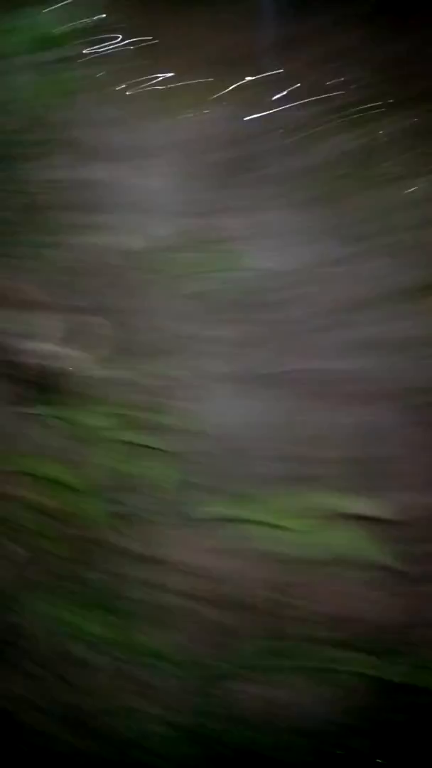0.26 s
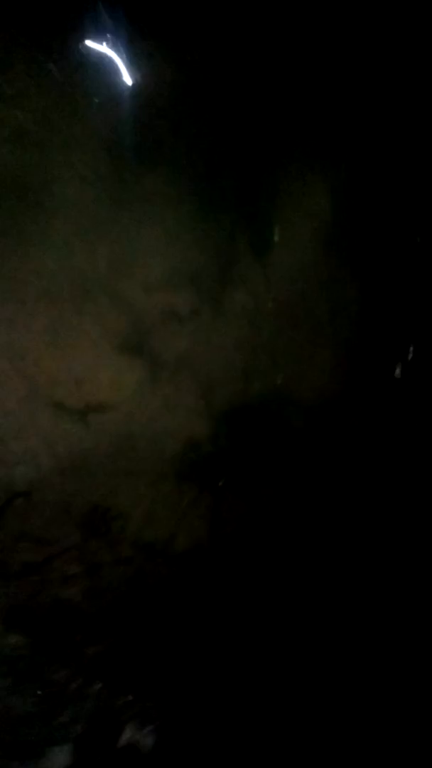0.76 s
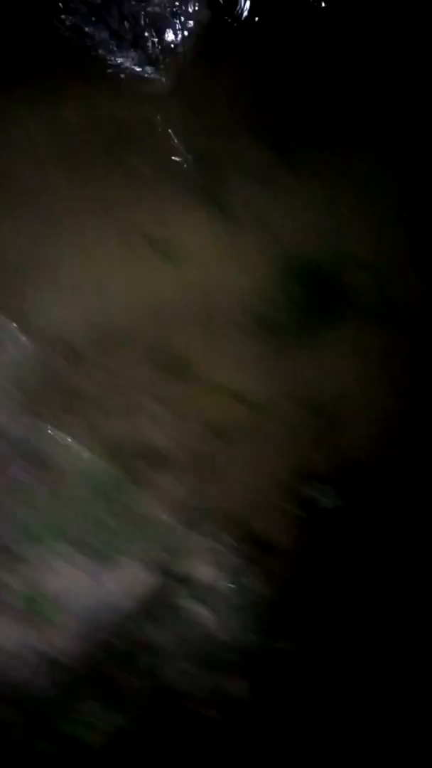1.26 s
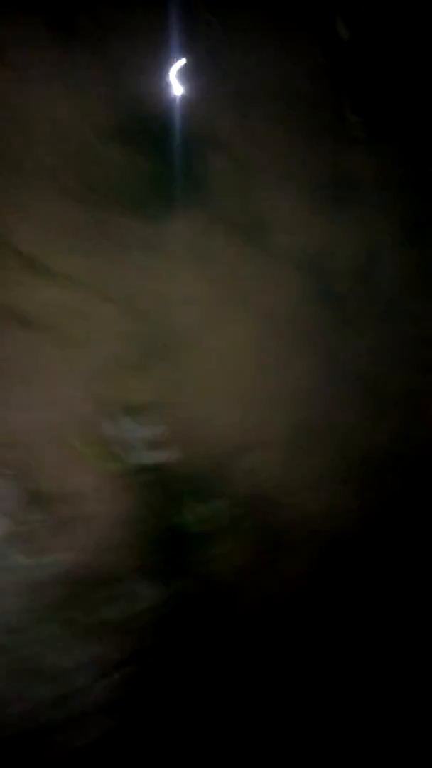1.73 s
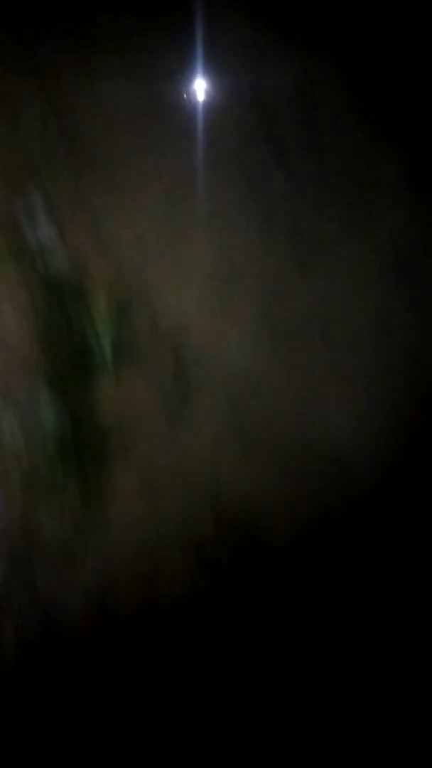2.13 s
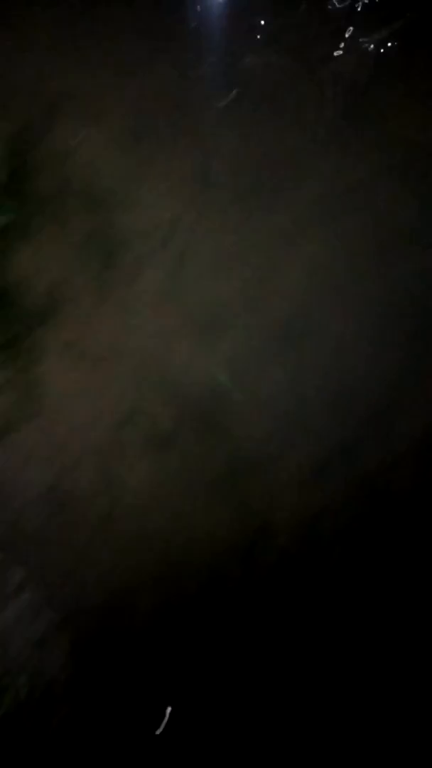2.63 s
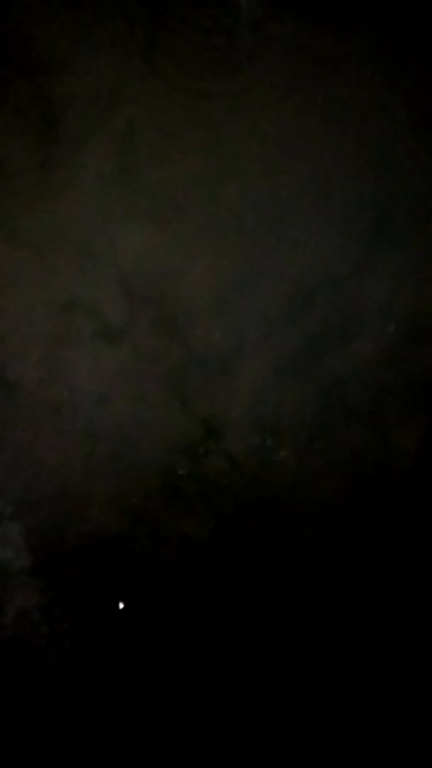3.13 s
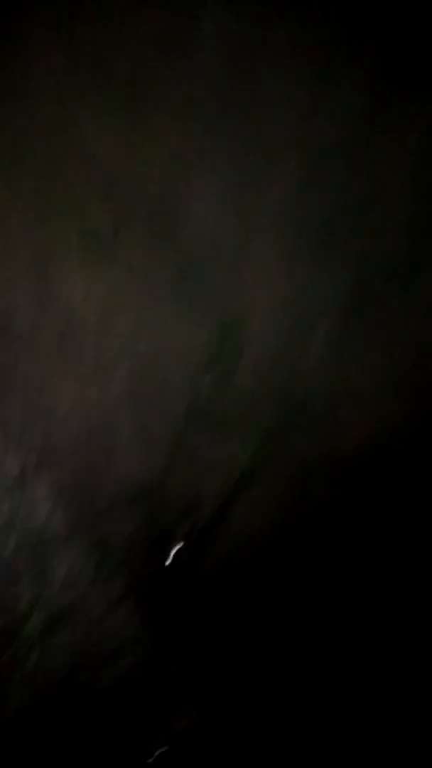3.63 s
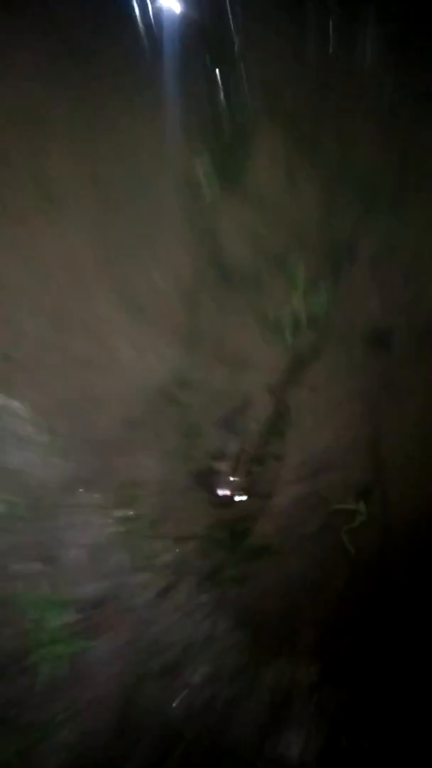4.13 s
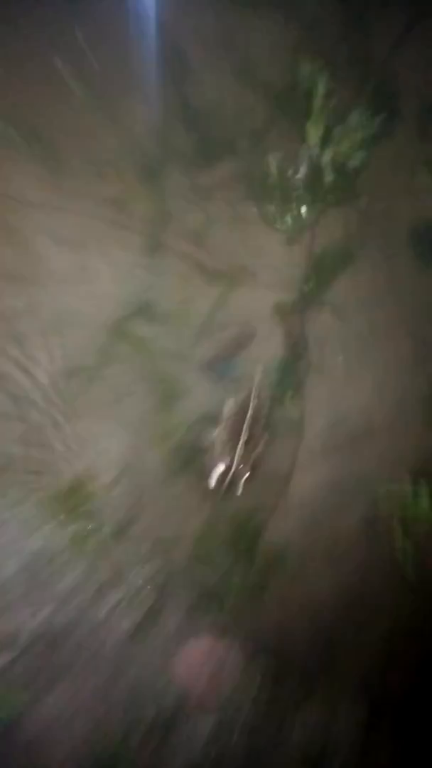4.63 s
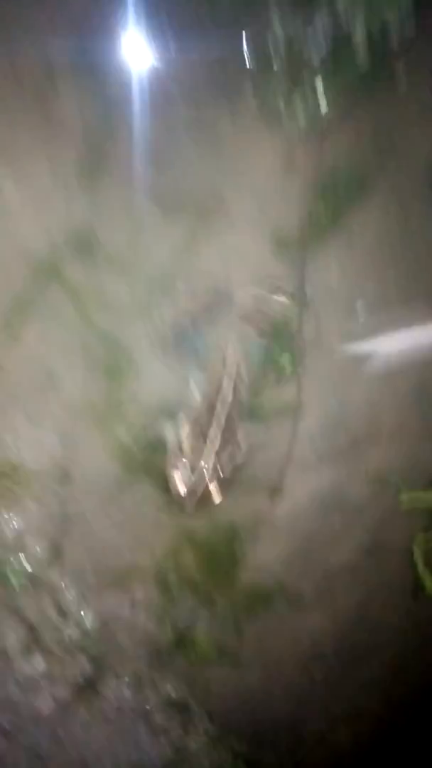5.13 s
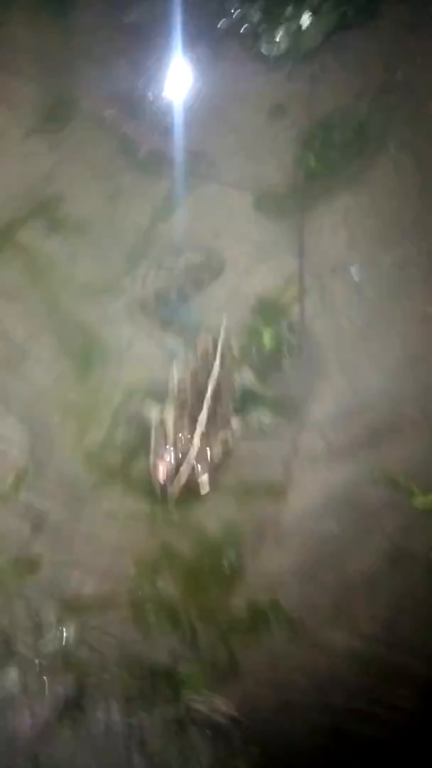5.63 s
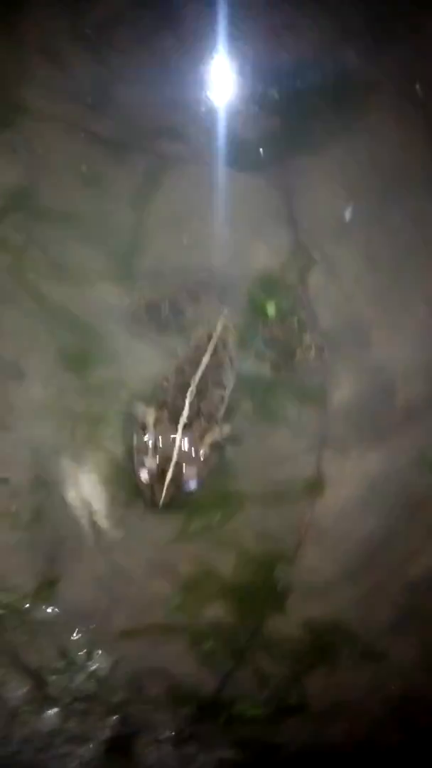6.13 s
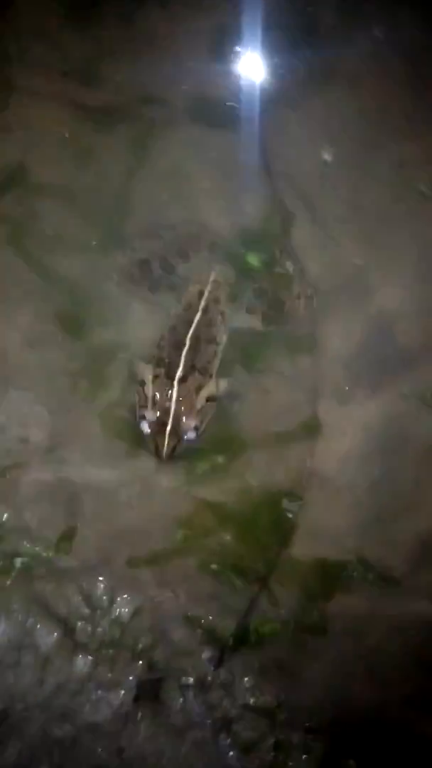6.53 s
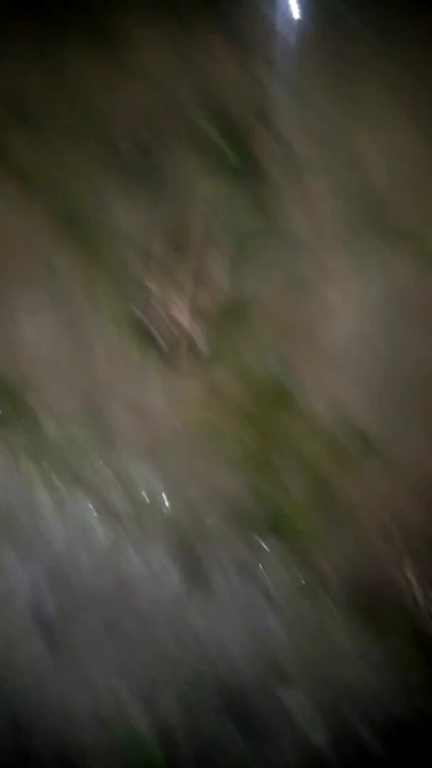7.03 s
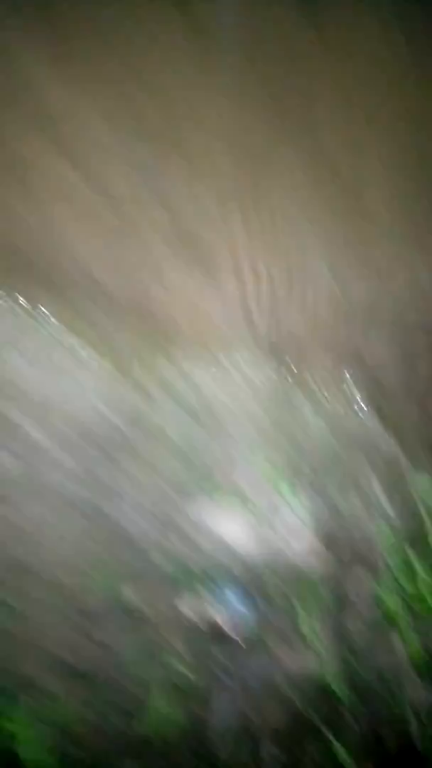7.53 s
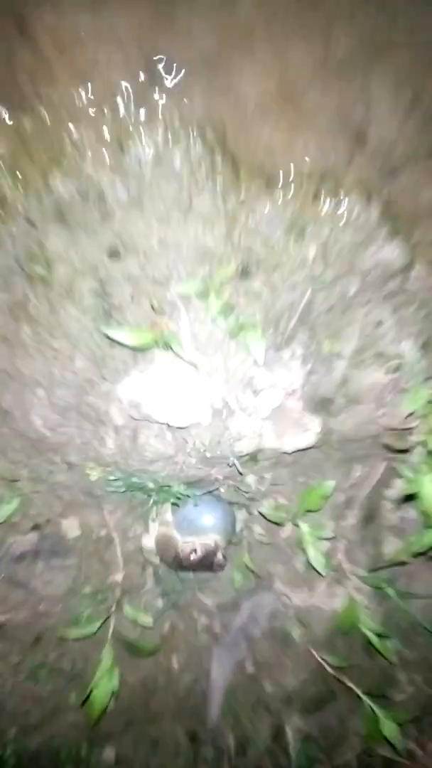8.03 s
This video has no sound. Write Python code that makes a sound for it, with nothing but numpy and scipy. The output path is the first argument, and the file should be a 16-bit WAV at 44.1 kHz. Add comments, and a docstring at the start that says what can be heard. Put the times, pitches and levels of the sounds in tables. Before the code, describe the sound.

Close, unbroken toad trilling, about seven notes a second, muffled then suddenly bright near the end, with far toads and light handling noise.

```python
"""A pond edge at night. From the start a toad trills close by: each note is a run of pulses and a held tone that sags.
Over soft night hiss, far toads call alike; steps rustle, click and thump, and low air noise swells as the camera swings.
The hand-held camera turns away in the first second. After 1 s, lead-in pulses come before each note.
Soft hoots sound from 2.5 s, a neighbour toad joins at 3 s, and false starts slip in from 5.4 s.
The camera faces the toad again at 7.5 s. Toads are sine pulses that strike resonances; the rest is mostly shaped noise."""
import sys
import numpy as np
from scipy import signal
from scipy.io import wavfile
from scipy.ndimage import uniform_filter1d

SR = 44100
rng = np.random.default_rng(int(sys.argv[2]) if len(sys.argv) > 2 else 0)


def store_wav(level_fs):
    """Save 16-bit WAV to argv[1]."""
    pcm = np.round(np.clip(np.atleast_2d(level_fs), -1, 1) * 32767)
    wavfile.write(sys.argv[1], SR, pcm.T.astype(np.int16))


N = 365148  # length in samples

# short pulses in a run: valid until t/s, number of pulses
PULSES_PER_RUN = [(.1, 5), (.25, 4), (.5, 3), (1, 4), (2.45, 3), (9, 4)]
# how the near toad is heard: t/s, pulse level/dB, microphone facing the toad (acts on the rings)/dB, overtones/dB
TOAD = [(0, -25.5, -2, 0.5), (.55, -20.5, -8, -6.5), (.85, -20, -8, -17), (1.15, -16, -14.5, -11.5),
        (1.9, -16, -10, -18), (2.3, -15.5, -10.5, -7.5), (2.6, -13, -16, -14.5), (3.6, -14.5, -8.5, -12.5),
        (4.15, -15.5, -1, -3), (4.4, -13.5, -4.5, -2), (5, -9.5, -11.5, -15), (5.8, -9.5, -11, -7),
        (7.2, -9.5, -8.5, -2), (7.5, -11.5, 7, 11), (7.8, -10.5, 9.5, 7.5), (8.28, -10, 8.5, 6)]
# overtones of the sac: multiple of the pitch, relative level in pulses/dB, in the held tone/dB
OVERTONES = [(2, -17.5, -14.5), (3, -49.5, -37.5)]
# resonances that stay put and that each pulse strikes: f/Hz, width/Hz, relative level/dB, share of the facing
RINGS = [(640, 300, -17, .1), (925, 150, -13, .1), (2250, 400, -28, .6), (2850, 350, -21, .5),
         (3800, 550, -30, .9), (5620, 70, -31, -.2), (6250, 60, -30, .8), (7780, 70, -56, .2),
         (9200, 90, -58, .1), (10050, 170, -43, .25), (10900, 120, -46, .7), (11350, 220, -42, .8)]
# far toads: pitch f/Hz before glides, notes a second, relative level/dB
FAR = [(1702, 6.3, 1.5), (1567, 7.2, 0.5), (1496, 7.7, -6), (1395.5, 6.4, 5)]
# far toads together: t/s, level/dB
CHORUS = [(0, -38.5), (1.6, -39.5), (5.7, -40.5), (8.28, -38.5)]
# spectrum of leaves and cloth: f/Hz, relative level/dB
RUSTLE_COLOUR = [(200, -21.5), (800, 11.5), (3000, -3.5), (7000, -11), (8600, -13.5), (10500, -14),
                 (12800, -25), (15000, -9)]
# spectrum of the night hiss: f/Hz, relative level/dB
NIGHT_COLOUR = [(300, -1), (900, 8), (3000, 2.5), (3800, -17), (5500, -24), (8700, -33), (10300, -30.5),
                (12500, -35.5), (14900, -22.5)]
NIGHT_DB = -54
# snaps of twigs and grip: t/s, peak level/dB, f/Hz
CLICKS = [(0.149, -37, 15300), (0.604, -38.5, 14800), (0.837, -29, 4000), (1.095, -33, 5010),
          (1.104, -27.5, 15500), (1.2065, -31, 5360), (1.308, -37, 4310), (1.331, -30.5, 4300),
          (1.3579, -34, 10630), (1.4299, -42, 8700), (1.479, -35.5, 6300), (2.813, -34.5, 6860),
          (3.497, -32.5, 6960), (3.5347, -39.5, 8050), (3.7714, -39.5, 7200), (6.9267, -45, 8000),
          (7.0554, -46, 14500), (7.0853, -40, 8700), (7.1786, -38, 14500), (7.2031, -36, 8700),
          (7.2285, -39, 9000), (7.2923, -36, 8700)]
# thumps on the body of the camera: t/s, relative level/dB, starting f/Hz, pitch change in 40 ms (share)
THUMPS = [(.454, -37, 110, 0.3), (1.366, -40.5, 108, 0.07), (1.953, -36, 560, -.1), (2.166, -35, 570, -.6),
          (2.186, -30, 275, -1.2), (2.277, -26.5, 310, 4), (7.385, -32.5, 155.2, 0.2),
          (7.561, -38, 140, -0.43), (7.637, -38.5, 125, 0.45), (8.04, -35, 154, -.2)]
# spectrum of air on the microphone port: f/Hz, relative level/dB
RUMBLE_COLOUR = [(40, -23), (65, 0), (140, 1.5), (300, -11.5), (600, -38.5), (15000, -84.5)]
# the rumble, up when the camera swings: t/s, level/dB
RUMBLE_DB = [(0, -69), (.45, -49), (.9, -68), (1.4, -50), (1.8, -61.5), (2.2, -57.5), (2.7, -65.5),
             (4.2, -66), (4.6, -50), (5, -64), (6.7, -58.5), (7.3, -53), (8.28, -52)]
# notes of the near toad: run starts at t/s, held tone against the pulses/dB
NOTES = [(0.048, -1.5), (0.183, -3.5), (0.308, -2.5), (0.426, -2), (0.545, -4.5), (0.669, -6),
         (0.795, -5.5), (0.9144, -1.5), (1.0584, -2.5), (1.204, -4), (1.3481, -5.5), (1.4938, -4.5),
         (1.6355, -2), (1.79, -4), (1.9318, -3.5), (2.0742, -4), (2.2203, -3.5), (2.3617, -2.5),
         (2.5087, -6), (2.6519, -6.5), (2.797, -4.5), (2.9427, -6), (3.0899, -4), (3.2355, -5.5),
         (3.381, -7), (3.527, -7), (3.677, -6.5), (3.822, -1.5), (3.9676, -2), (4.1109, -5), (4.2545, -2),
         (4.4018, -4), (4.5501, -5.5), (4.6962, -7.5), (4.835, -4.5), (4.9794, -5.5), (5.1231, -5),
         (5.267, -6), (5.425, -6), (5.575, -4.5), (5.724, -6.5), (5.871, -5), (6.012, -4), (6.1785, -4),
         (6.3234, -5), (6.47, -5.5), (6.6136, -5.5), (6.7556, -6.5), (6.9037, -8), (7.0443, -7),
         (7.1902, -3.5), (7.3492, -4.5), (7.498, -8.5), (7.6463, -5), (7.7878, -7), (7.9348, -7),
         (8.0761, -6), (8.224, -5.5)]
# lead-ins that the run does not follow at once: t/s, number of pulses
FALSE_STARTS = [(5.3811, 2), (6.1292, 3), (7.3055, 2)]
# notes near these times have three lead-in pulses, the others two: t/s
LONG_LEADS = [1.79, 1.93, 4.55, 4.7, 5.27, 5.72, 7.19, 7.5, 7.65, 8.22]
# steps and grips in leaves and cloth: t/s, hold/s, relative level/dB
STEPS = [(0.125, 0.023, -67), (0.592, 0.022, -67.5), (0.816, 0.16, -64.5), (1.083, 0.099, -66.5),
         (1.304, 0.016, -62), (1.87, 0.49, -60.5), (2.26, 0.13, -53.5), (2.475, 0.46, -71),
         (3.386, 0.24, -69), (3.771, 0.073, -66), (6.693, 0.16, -67), (7.07, 0.22, -64.5)]
# a neighbour a few metres off, turned towards the microphone: runs start at t/s
NEIGHBOUR = [2.99, 3.137, 3.259, 3.539, 3.678, 3.997, 4.159, 4.297, 4.437, 4.606, 4.744, 4.871, 5, 5.139,
             5.281, 5.423, 6.079, 6.225, 6.361, 6.489, 7.4, 7.549]
# brief soft low tones, far off: t/s, f/Hz, peak level/dB
HOOTS = [(2.538, 226, -49), (3.54, 413, -50), (7.952, 351, -49)]

PITCH_HZ, COLD_HZ, WARM_S, CLIMB_HZ_PER_S = 1457.3, 96.4, 0.64, 4.5  # the sac starts low and warms up
GAP_CYCLES, HELD_MS = 11.8, 12.75  # pulses lie so many cycles of the sac apart; the held tone then fades
LEADS_FROM_S = 1  # no lead-ins before this
LEAD_MS, LONG_LEAD_MS, QUICK_LEAD_MS = 27, 29.8, 17.5  # ahead of the run: two pulses, three, after a false start
THROAT_HZ, THROAT_WIDTH_HZ, THROAT_DB = 2770, 440, -21.5  # lifts the second overtone
VOICE_LOW_HZ, VOICE_TOP_HZ = 530, 11700
BOUNCE_MS, BOUNCE_DB = 3.2, -9  # average delay of the echo off the water
BOUNCE_SWAY_MS, BOUNCE_SWAY_HZ = 0.788, .35  # its typical shift and slowest rate as the hand sways
STEP_ATTACK_S, STEP_FADE_DB_PER_S, STILL_DB = 0.013, 178.5, -75  # the last is relative, like the step levels
NEIGHBOUR_HZ, NEIGHBOUR_DB, NEIGHBOUR_BRIGHT_DB = 1412, -38, 11  # pitch before glides; pulse level; overtones
LOW_CUT_HZ, EDGE_HZ = 71, 15600  # bass cut of the microphone; upper limit of the whole sound


def amp(db):
    """Turn decibels into a plain multiplier."""
    return 10 ** (np.asarray(db) / 20)


def evened(x):
    """Scale a sound to an average (RMS) strength of 1."""
    return x / np.sqrt(np.mean(x ** 2) + 1e-20)


def add(mix, s, sound):
    """Lay a sound into the mix at s seconds, cut off at the end."""
    part = mix[..., max(round(s * SR), 0):][..., :sound.shape[-1]]
    part += sound[..., :part.shape[-1]]


def curve(rows, column=1):
    """Draw straight lines between the table's points, one value a sample."""
    rows = np.array(rows)
    return np.interp(np.arange(N) / SR, rows[:, 0], rows[:, column])


def ring(x, hz, width):
    """A resonance: each click starts a sine of its own height that dies away, faster if the width is larger."""
    decay, step = np.exp(-np.pi * width / SR), 2 * np.pi * hz / SR
    return signal.lfilter([0, np.sin(step)], [1, -2 * decay * np.cos(step), decay * decay], x)


def noise(colour, patchy_db, flicker_db, size=16):
    """Random short-time spectra with patches (size frames long) and flicker across all pitches at once."""
    frames, hz = N // 128 + 5, np.fft.rfftfreq(512, 1 / SR)
    real, imaginary, patches = rng.standard_normal((frames, 257, 3)).T
    patches = uniform_filter1d(patches, size=8, axis=0)  # smooth over pitch
    patches = evened(uniform_filter1d(patches, size=size, axis=1))  # smooth over time
    f, db = np.transpose(colour)
    level_db = np.interp(np.log(hz + 1), np.log(f), db)[:, None] + patchy_db * patches
    level_db = level_db + flicker_db * rng.standard_normal(frames)
    spectra = (real + 1j * imaginary) * amp(level_db)
    return evened(signal.istft(spectra, nperseg=512, noverlap=384)[1][:N])


def tail(x, t60):
    """Diffuse echoes from bank and bushes: scattered random taps, energy 1, that fall 60 dB in t60 seconds."""
    t = np.arange(SR // 2) / SR
    scattered = rng.standard_normal(len(t)) * (rng.random(len(t)) < .05)
    taps = scattered * amp(-60 * t / t60) * (t > .004)
    return signal.oaconvolve(x, taps / np.linalg.norm(taps))[:N]


def night_hiss():
    """Soft, patchy, flickering background noise."""
    return amp(NIGHT_DB) * noise(NIGHT_COLOUR, 2.5, 2.5, size=30)


def rumble():
    """Air on the microphone port: low noise that swells when the camera swings."""
    return amp(curve(RUMBLE_DB)) * noise(RUMBLE_COLOUR, 5.5, 1.6, size=40)


def pulse(voice, s, db, hz, direct, held_ms=0):
    """The folds snap open and the sac rings; a held tone lasts and sags. Rows: tone, overtones, drive of the rings."""
    t = np.arange(round((held_ms + 16) * SR / 1000)) * 1000 / SR  # in ms
    rise = 2.6 - 1.3 * direct  # in ms; heard from the front (direct = 1), a pulse starts sharper
    if held_ms:
        swell = np.sin(np.pi / 2 * np.clip(t / rise, 0, 1))
        shape = swell * amp(-.3 * t) / (1 + np.exp((t - held_ms - 3.8) / 1.7))
        glide = .985 - 0.06 * np.clip(t / (held_ms + 4), 0, 1.2)
        fold_multiples = (4, 8)
    else:
        hump = (t / rise * np.exp(1 - t / rise)) ** (2.4 - 1.6 * direct)
        shape = hump * np.sin(np.pi / 2 * np.minimum(t / 0.33, 1)) ** 2
        glide = 1.015 - .004 * t
        fold_multiples = (4, 5)
    turn = 2 * np.pi * np.cumsum(hz * glide) / SR
    wobble = .014 * np.cumsum(rng.standard_normal(len(t)))
    sound = np.zeros((3, len(t)))
    # from the front the overtones outlast the held tone
    sound[0] = shape * np.sin(turn) * amp(-.35 * direct * t * (held_ms > 0))
    overtones = sum(amp(held if held_ms else short) * np.sin(k * turn) for k, short, held in OVERTONES)
    sound[1] = shape ** 1.41 * overtones
    # high multiples of the folds, unsteady
    sound[2] = amp(-39.0) * shape * sum(np.sin(k * (turn + wobble)) for k in fold_multiples)
    # air hissing past them
    hiss = np.diff(rng.standard_normal(len(t) + 2), 2)
    sound[2] += amp(-33 if held_ms else -24) * shape ** 2 * hiss
    snap = np.hanning(15) / 7
    sound[2, 20:35] += snap * (.6 if held_ms else 1.1) * amp(2.4 * rng.standard_normal())
    sound[2] *= amp(0.5 * (db - 4.0))  # harder pulses ring more
    add(voice, s - rise / 1000, amp(db) * sound)


def run_of_pulses(voice, hz, direct, spacing_ms, held_ms, count, s, db, held_db):
    """The first gap is shorter and the first pulse weaker and higher; the held tone takes the last place."""
    luck = rng.standard_normal((6, 3))  # small differences in level, pitch and timing
    for k in range(count):
        first = k == 0
        at = s + (max(k - .13, 0) * spacing_ms + .25 * luck[k, 2]) / 1000
        level_db = db - 1.9 * first - 0.56 * max(k - 1, 0) + 0.58 * luck[k, 0]
        pulse(voice, at, level_db, hz * (1 + 0.028 * first + 0.013 * luck[k, 1]), direct)
    held_at = s + (count - .25) * spacing_ms / 1000
    pulse(voice, held_at, held_db + 2.0, hz, direct, held_ms)


def lead_in(voice, hz, direct, s, count, db):
    """Two or three pulses ahead of a run; the second is set strongest."""
    luck = rng.standard_normal((3, 2))
    for k in range(count):
        level_db = db - (3.3, 1.3, 3.6)[k] + 0.38 * luck[k, 0]
        pulse(voice, s - .0006 + k * .0079, level_db, hz * (0.989 + 0.0027 * luck[k, 1]), direct)


def voiced(voice, facing_db, overtone_db):
    """Tone, overtones and rings, brighter when the microphone faces the animal; so small a body sends out no bass."""
    tone, overtones, drive = voice
    rings = 0
    for hz, width, db, share in RINGS:
        soft = 150 + 3 * width  # two wider resonances round the start of each ring
        rounded = ring(ring(drive, hz, soft), hz, 2 * soft)
        struck = ring(rounded, hz, width) * soft ** 2 / 12340000.0
        rings = rings + amp(db + share * facing_db) * struck
    throat = amp(THROAT_DB) * ring(overtones, THROAT_HZ, THROAT_WIDTH_HZ)
    sound = tone + amp(overtone_db) * (0.49 * overtones + throat) + rings
    sound = signal.sosfilt(signal.butter(8, VOICE_TOP_HZ, fs=SR, output="sos"), sound)
    return signal.sosfilt(signal.butter(6, VOICE_LOW_HZ, "high", fs=SR, output="sos"), sound)


def chorus():
    """Each far toad keeps its own slightly uneven beat; distance adds echoes."""
    voice = np.zeros((3, N))
    for hz, rate, db in FAR:
        beats = np.arange(70) + rng.random() + .08 * rng.standard_normal(70)
        for s in beats / rate:
            lead_in(voice, hz, 0.3088, s, 2, db)
            run_of_pulses(voice, hz * .99, .3, 7.9, 14, 4, s + .027, db, db - 3)
    voice[2] *= .3
    dry = voiced(voice, 0.42, -0.52)
    return amp(curve(CHORUS)) * evened(dry + amp(-2.5) * tail(dry, 0.24))


def bounce(x):
    """One reflection off the water, whose path length wanders as the hand sways."""
    t = np.arange(N) / SR
    waves = (np.sin(2 * np.pi * (BOUNCE_SWAY_HZ * k * t + rng.random())) / k for k in (1, 1.7, 3.1))
    sway = evened(sum(waves))
    return amp(BOUNCE_DB) * np.interp(t - (BOUNCE_MS + BOUNCE_SWAY_MS * sway) / 1000, t, x)


def toad():
    """The near caller: its pitch climbs as the sac warms up, and facing the microphone sharpens and brightens it."""
    voice, t = np.zeros((3, N)), np.arange(N) / SR
    pitch = PITCH_HZ - COLD_HZ * np.exp(-t / WARM_S) + CLIMB_HZ_PER_S * t
    level_db, facing_db = curve(TOAD, column=1), curve(TOAD, column=2)
    direct = np.clip((facing_db + 13.0) / 14, 0, 1)
    for s, pulses in FALSE_STARTS:
        i = round(s * SR)
        lead_in(voice, pitch[i], direct[i], s, count=round(pulses), db=level_db[i])
    for s, held_db in NOTES:
        i = round(s * SR)
        count = next(n for until, n in PULSES_PER_RUN if until > s)
        hurried = any(0 < s - early < .06 for early, _ in FALSE_STARTS)
        long = any(abs(s - near) < .03 for near in LONG_LEADS)
        ahead_ms = QUICK_LEAD_MS if hurried else LONG_LEAD_MS if long else LEAD_MS
        lead_count = (s > LEADS_FROM_S) * (2 + long)
        lead_in(voice, pitch[i], direct[i], s - ahead_ms / 1000, count=lead_count, db=level_db[i])
        spacing_ms = 1000 * GAP_CYCLES / pitch[i]
        run_of_pulses(voice, pitch[i], direct[i], spacing_ms, HELD_MS, count, s, level_db[i],
                      level_db[i] + held_db)
    dry = voiced(voice, facing_db, curve(TOAD, column=3))
    return dry + bounce(dry) + amp(-30.0) * tail(dry, 0.2)


def rustle():
    """Leaves and cloth: patchy hiss with random crackles in it; each step starts quickly, holds and fades."""
    t, level = np.arange(N) / SR, 0
    for s, hold_s, db in STEPS:
        fade_db = STEP_FADE_DB_PER_S * np.maximum(t - s - hold_s, 0)
        level = level + np.clip((t - s) / STEP_ATTACK_S, 0, 1) * amp(db - fade_db)
    chosen = rng.random(N) < 110 / SR  # about 110 crackles a second
    crackle = amp(6 * np.minimum(rng.exponential(1, N), 3.2)) * chosen
    gate = evened(signal.lfilter([1], [1, -.98], crackle))  # each crackle dies away
    loudness = 4.6 * amp(STILL_DB) + level * (4.2 + 2.9 * gate)
    return noise(RUSTLE_COLOUR, 4, 2, size=6) * loudness


def clicks():
    """Snaps of twigs and grip: short noise bursts, partly ringing round a pitch."""
    out, t = np.zeros(N), np.arange(3000) / SR
    for s, db, hz in CLICKS:
        burst = rng.standard_normal(len(t)) * amp(-60 * t / 0.012)
        burst = 0.29 * burst + evened(ring(burst, hz, 1800)) * 0.089
        add(out, s, amp(db) * burst / abs(burst).max())
    return out


def thumps():
    """Knocks on the camera body: a few low cycles that may glide, with some ringing noise above."""
    out, t = np.zeros(N), np.arange(3000) / SR
    for s, db, hz, glide in THUMPS:
        u = t / 0.007  # the swell is fullest after 7 ms
        turn = 2 * np.pi * np.cumsum(hz * np.clip(1 + glide * t / 0.04, .3, 4)) / SR
        knock = np.cos(turn) + 0.333 * evened(ring(rng.standard_normal(len(t)), 2.085 * hz, 270))
        add(out, s, amp(db) * u * np.exp(1 - u) * knock)
    return out


def hoots():
    """Each is a plain sine tone that swells and fades."""
    out, t = np.zeros(N), np.arange(5500) / SR
    for s, hz, db in HOOTS:
        add(out, s, amp(db) * np.hanning(len(t)) * np.sin(2 * np.pi * hz * t))
    return out


def neighbour():
    """The same kind of note from a second toad, quieter, bright and with echoes."""
    voice = np.zeros((3, N))
    for s in NEIGHBOUR:
        lead_in(voice, NEIGHBOUR_HZ, 0.33, s - .027, count=2, db=NEIGHBOUR_DB)
        run_of_pulses(voice, NEIGHBOUR_HZ, 0.28, 7.5, HELD_MS, count=4, s=s, db=NEIGHBOUR_DB,
                      held_db=NEIGHBOUR_DB - 4.5)
    voice[2] *= .3
    dry = voiced(voice, 3.0, NEIGHBOUR_BRIGHT_DB)
    return dry + amp(-13.5) * tail(dry, 0.074)


def scene():
    """All sounds added together, as one channel."""
    background = night_hiss() + rumble()
    toads = chorus() + toad() + neighbour()
    movement = rustle() + clicks() + thumps()
    return (background + toads + movement + hoots())[None]


def record(dry):
    """The microphone's bass cut, then the upper limit of the whole sound."""
    cut = signal.sosfilt(signal.butter(2, LOW_CUT_HZ, "high", fs=SR, output="sos"), dry)
    band_limit = signal.firwin(511, EDGE_HZ, window=("kaiser", 9), fs=SR)
    return signal.oaconvolve(cut, band_limit[None], "same")


dry = scene()
out = record(dry)
store_wav(out)
```